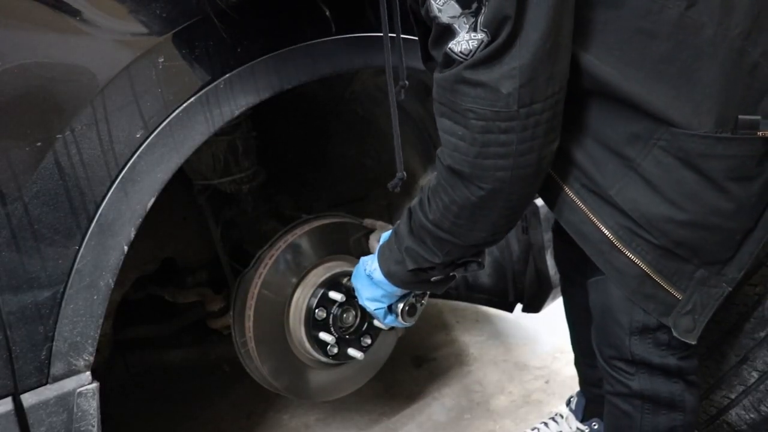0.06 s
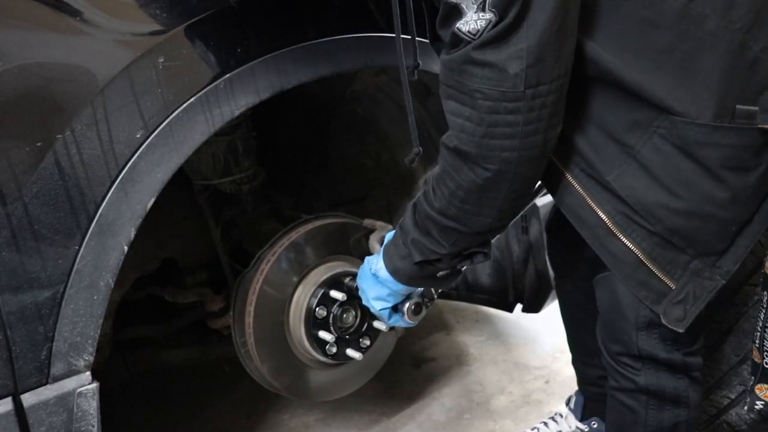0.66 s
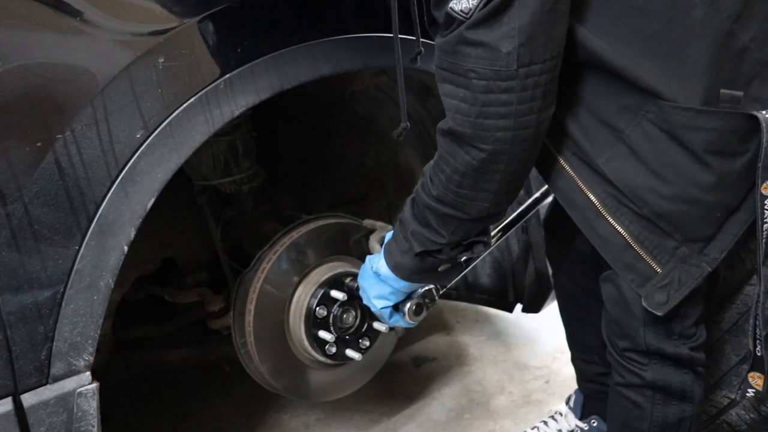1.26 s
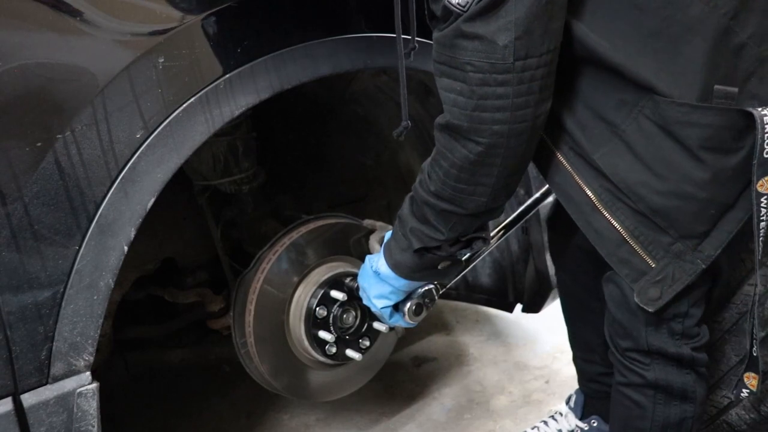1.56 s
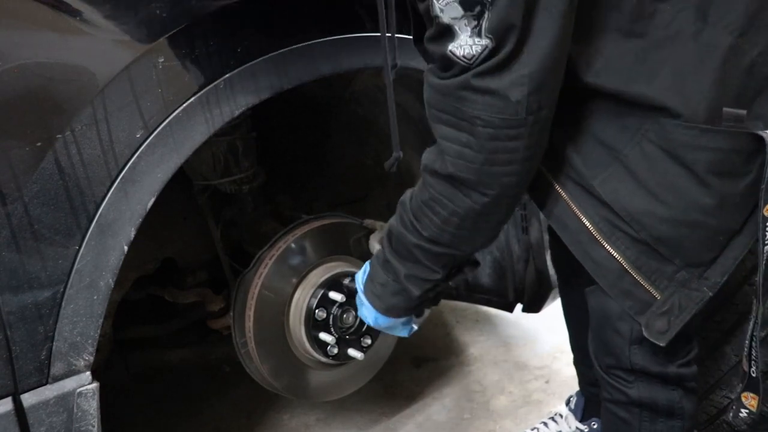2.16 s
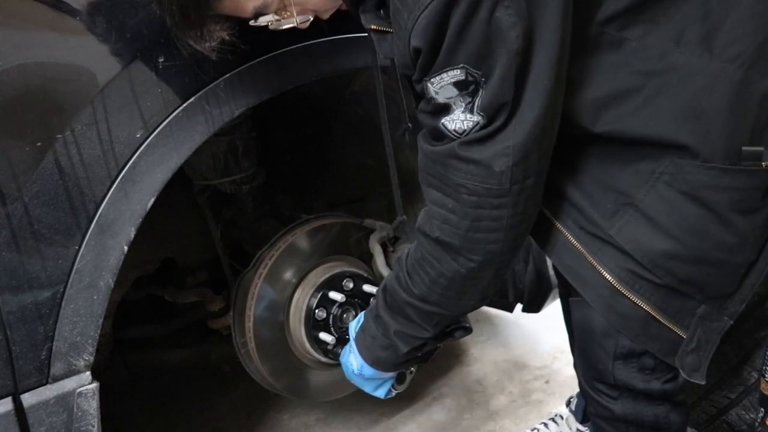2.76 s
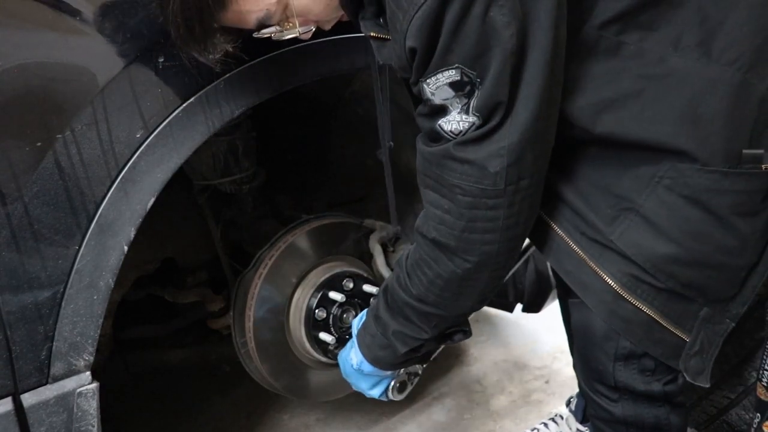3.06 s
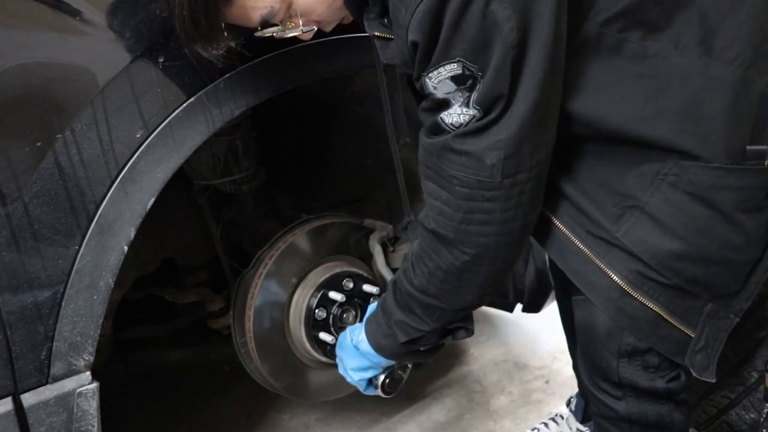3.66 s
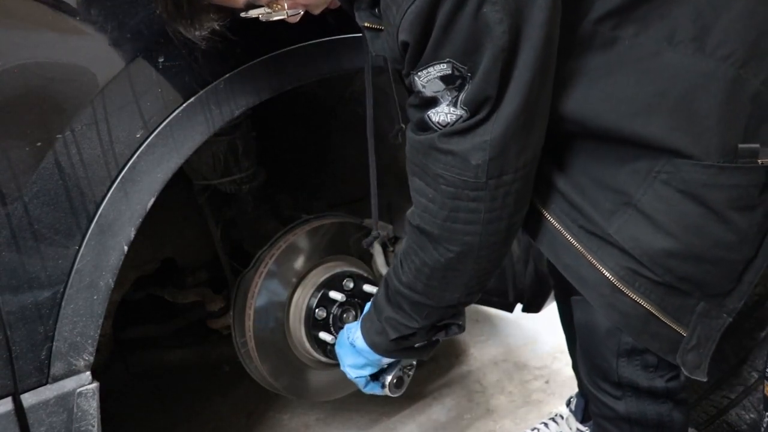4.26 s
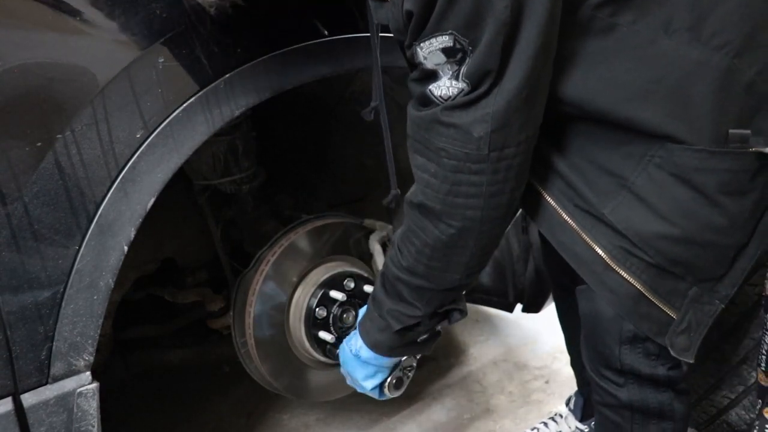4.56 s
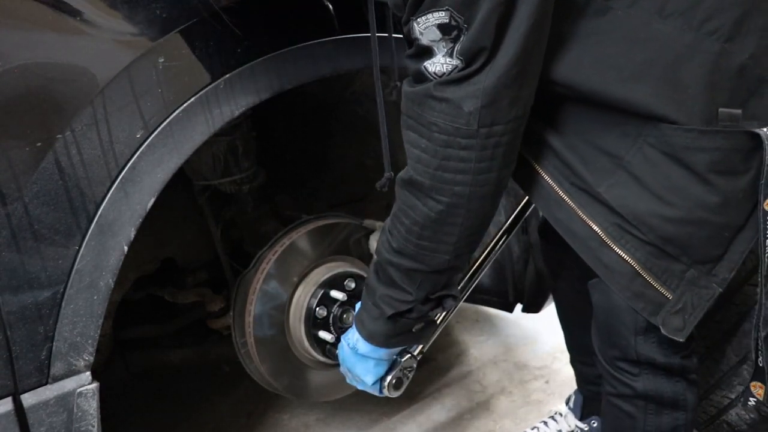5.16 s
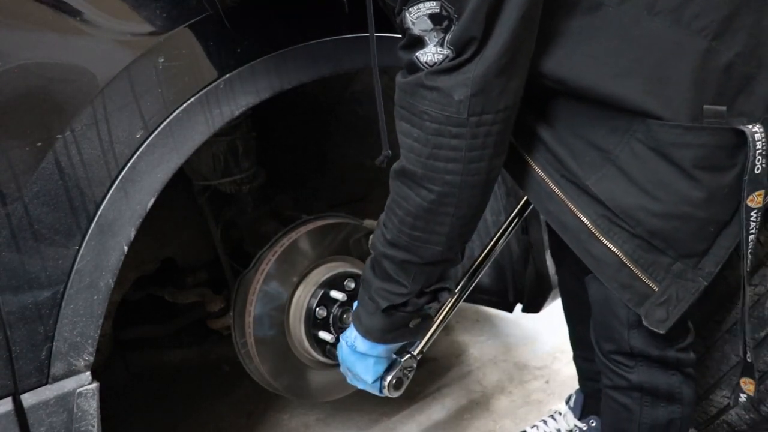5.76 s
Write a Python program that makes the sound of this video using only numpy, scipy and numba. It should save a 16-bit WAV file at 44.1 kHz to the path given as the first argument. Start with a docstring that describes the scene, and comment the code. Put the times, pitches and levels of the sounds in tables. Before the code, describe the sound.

A torque wrench works close by on a car's bare wheel hub in a quiet garage. Two ratchet ticks open, followed by faint socket taps around 0.4 seconds. After a slight rub, the wrench gives way at 1.5 seconds with a loud steel snap and a high ring, then snaps back at 1.9. From 2.2 to 3 seconds the socket knocks and clinks onto the next nut. Between 3.5 and 4 seconds the ratchet ticks about eight times while the nut scrapes softly on its thread. A few faint taps and a light rub follow, then a last hard, ringing snap at 5.6 seconds. The blows carry a low thud from the hub and a short room echo, and the snaps slightly overload the stereo microphones. A jacket rustles faintly now and then over low, steady room noise.

```python
"""A garage, close to a bare wheel hub, on a camera's stereo microphones. A long torque wrench
tightens two lug nuts: it breaks over with a ringing snap and snaps back, the socket knocks onto the
next nut, the ratchet ticks, and it snaps again. Each blow is steel chattering on steel: tool and brake
disc ring, the hub booms. A jacket rustles, the wheel well and the room answer, and the snaps overload
the camera's limiter."""
import sys
import numpy as np
from scipy import signal
from scipy.fft import rfft, irfft, next_fast_len
from scipy.io import wavfile
from scipy.ndimage import uniform_filter1d
from numba import njit

SR = 44100
rng = np.random.default_rng(int(sys.argv[2]) if len(sys.argv) > 2 else 0)


def pcm_store(signal):
    """Save signal as 16-bit PCM."""
    levels = np.round(np.clip(np.atleast_2d(signal), -1, 1) * 32767)
    wavfile.write(sys.argv[1], SR, levels.astype(np.int16).T)


N = 265041
T = np.arange(N) / SR
PORTS_HZ = 730  # longer waves reach both microphones alike

# The ringing of the wrench tube. Each row: frequency in Hz, level in dB, t60 in seconds.
TUBE_MODES = [(1979, -13, .7), (3284, -20, .4), (3890, -14, .12), (4022, -8, .35), (4116, 3, .46),
              (11025, -19, .34)]


def undb(db):
    """Decibels to gain."""
    return 10 ** (np.asarray(db) / 20)


def unit(x):
    """Scale to rms 1."""
    return x / np.sqrt(np.mean(x ** 2))


def fade(t, t60):
    """Exponential decay, 60 dB down after t60 seconds."""
    return np.exp(-np.log(1000) * t / max(t60, .002))


def on_log(hz, points_hz, values):
    """Read a curve on a log-frequency axis."""
    return np.interp(np.log(hz + 1), np.log(points_hz), values)


def colour(x, points):
    """Minimum-phase filter with the given (Hz, dB) response, falling away under its lowest point."""
    size = next_fast_len(x.shape[-1] + 4096, real=True) * 2
    hz = np.arange(size // 2 + 1) * SR / size
    points_hz, db = np.transpose(points)
    gain = undb(on_log(hz, points_hz, db)) * np.clip(hz / points_hz[0], .03, 1) ** 2
    cepstrum = irfft(np.log(gain))
    cepstrum[1:size // 2] *= 2
    cepstrum[size // 2 + 1:] = 0
    return irfft(rfft(x, size) * np.exp(rfft(cepstrum)))[..., :x.shape[-1]]


def stereo_noise(size, alike):
    """Noise at the two microphones: the same in the bass, with correlation `alike` in the treble."""
    hz = np.arange(size // 2 + 1) * SR / size
    treble = 1 - 1 / (1 + (hz / PORTS_HZ) ** 3)
    side_share = (1 - alike) * treble / 2
    mid, side = rfft(rng.standard_normal((2, size)))
    return irfft(np.sqrt(1 - side_share) * mid + np.sqrt(side_share) * np.array([side, -side]), size)


def wander(rate_hz):
    """A smooth random curve with rms 1."""
    hold = int(SR / rate_hz)
    steps = np.repeat(rng.standard_normal(N // hold + 1), hold)
    return unit(uniform_filter1d(uniform_filter1d(steps, hold), hold)[:N])


def add(track, start, sound):
    """Mix a sound in at `start` seconds."""
    i = int(start * SR)
    track[:, i:i + sound.shape[1]] += sound[:, :N - i]


def stroke(start, length, attack_s, t60):
    """One movement: it gathers speed, holds until its length is up and dies away."""
    return np.clip((T - start) / attack_s, 0, 1) * fade(np.clip(T - start - length, 0, 2 * t60), t60)


def room_tone():
    """Quiet workshop noise, wavering slightly, with a little hiss of each microphone's own."""
    # Each row: frequency in Hz, level in dB.
    spectrum = [(13, -37), (22, -21), (85, -0.5), (111, -12.5), (178, -4), (221, -16), (261, -6),
                (353, -12.5), (452, -9), (505, -19.5), (580, -15), (1290, -17), (1560, -15), (2700, -18),
                (15700, -32.5)]
    workshop = stereo_noise(N, 0) * undb(.6 * wander(13))
    hiss = 0.37 * rng.standard_normal((2, N))
    return undb(-54) * unit(colour(workshop + hiss, spectrum))


def garage_echoes(x, well_db, well_t60):
    """Quick reflections in the wheel well, then the room's tail, which lasts longest in the bass."""
    # The room's reverberation. Each row: frequency in Hz, level in dB, t60 and build-up in seconds.
    bands = [(60, -6.5, 0.83, 0.052), (133.2, -2.5, 1, 0.02), (260, -10.5, 0.55, 0.068),
             (600, -0.5, 0.65, .02), (1700, -6.5, 0.57, 0.0053), (3840, -10.5, 0.53, 0.025),
             (7400, -10, .45, 0.0215), (11000, -11, 0.14, .015), (15000, -13, .33, .01)]
    band_hz, db, t60, build_s = np.transpose(bands)
    t, hz = T[:SR], np.arange(SR // 2 + 1)
    well = fade(t, well_t60) * (t > .003)
    response = undb(well_db) * stereo_noise(SR, 0.1) * well / np.linalg.norm(well)
    diffuse = rfft(stereo_noise(SR, .05))
    for k, share in enumerate(np.eye(len(bands))):
        band = irfft(diffuse * on_log(hz, band_hz, share), SR)
        tail = fade(t, t60[k]) * (1 - np.exp(-t / build_s[k]))
        response += undb(db[k]) * band * tail / np.linalg.norm(tail)
    return signal.fftconvolve(x, response, axes=1)[:, :N]


def jacket():
    """Cloth rubs in uneven little slips while the worker's body shifts with a low rumble."""
    # Shifts of weight or arm. Each row: start and length in seconds, relative swish and rumble in dB.
    moves = [(0.0, .06, -58, -50), (0.365, 0.19, -59.5, -48), (2.403, 0.29, -69.5, -51.5),
             (3.169, 0.18, -61, -63), (4.037, 0.2, -59, -54), (4.205, 0.15, -64.5, -40.5),
             (4.589, 0.12, -62, -66), (4.997, 0.34, -75, -59), (5.492, 0.031, -50.5, -49)]
    # The spectra of cloth and body. Each row: frequency in Hz, level in dB.
    cloth_spectrum = [(210, -35), (350, -5.5), (672, -4.5), (826, -10.5), (1380, -4), (1490, -7),
                      (3350, -11.5), (4460, -15.5), (15700, -32.5)]
    body_spectrum = [(21, -42), (35, -2), (65, 2), (108, -3.5), (178, 1.5), (254, -3), (339, -16),
                     (500, -11), (650, -61), (1100, -120)]
    swish, rumble = np.zeros((2, N))
    for start, length, swish_db, rumble_db in moves:
        speed = stroke(start, length, attack_s=0.0177, t60=.55)
        swish += undb(swish_db) * speed
        rumble += undb(rumble_db) * speed
    cloth = unit(colour(stereo_noise(N, 0.24) * undb(2 * wander(160)), cloth_spectrum))
    body = unit(colour(stereo_noise(N, 0.26) * undb(2 * wander(30)), body_spectrum))
    return undb(7.5) * swish * cloth + undb(-3.5) * rumble * body


def grind(strokes, spectrum, attack_s, t60, rough_db):
    """Steel sliding on steel in quick uneven slips."""
    slips = unit(colour(stereo_noise(N, 0.3) * undb(rough_db * wander(220)), spectrum))
    return slips * sum(undb(db) * stroke(start, length, attack_s, t60) for start, length, db in strokes)


def seat_rub():
    """The nut's seat rubs faintly as the torque builds before a snap."""
    # Each row: start in seconds, length in seconds, level in dB.
    pulls = [(1.22, .12, -61.5), (4.86, 0.15, -59)]
    # Each row: frequency in Hz, level in dB.
    spectrum = [(800, -35.5), (1300, -15), (1520, -3), (1780, -4.5), (2100, -11.5), (5000, -33),
                (15000, -52)]
    return grind(pulls, spectrum, attack_s=0.0906, t60=1.3, rough_db=2.5)


def thread_scrape():
    """The nut scrapes round on its thread, lightly and then under load."""
    # Each row: start in seconds, length in seconds, level in dB.
    turns = [(3.53, 0.25, -52.5), (3.76, 0.23, -39.5)]
    # Each row: frequency in Hz, level in dB.
    spectrum = [(70, -3), (170, -3), (330, 0), (600, -3.5), (900, -7), (1700, 0.5), (3500, -11),
                (12000, -22)]
    return grind(turns, spectrum, attack_s=0.0053, t60=0.25, rough_db=-1)


def release_creak():
    """The torque release grinds just before it first gives way."""
    # Each row: start in seconds, length in seconds, level in dB.
    creaks = [(1.44, 0.017, -16.5)]
    # Each row: frequency in Hz, level in dB.
    spectrum = [(59, -37.5), (100, -9.5), (730, -4.5), (1190, -12), (2240, 0), (2950, -7), (4500, 0),
                (5220, -11), (9440, -11.5), (15700, -17.5)]
    return grind(creaks, spectrum, attack_s=0.0041, t60=.06, rough_db=-0.5)


def ring(modes, spread_rad):
    """Modes struck a little unevenly; the higher ones reach the two microphones out of phase."""
    length_s = min(2, max(t60 for _, _, t60 in modes))
    t, tone = T[:int(SR * length_s)], 0
    for hz, db, t60 in modes:
        strength, phase, side = rng.standard_normal(3)
        right_shift = np.sign(side) * spread_rad * hz ** 2 / (hz ** 2 + PORTS_HZ ** 2)
        phases = np.array([[0], [right_shift]]) + np.pi * phase
        tone = tone + undb(db + strength / 2) * fade(t, t60) * np.sin(2 * np.pi * hz * t + phases)
    return tone


def blows(events, spectrum, modes, crack_db, ring_db, disc_db, hub_db, hub_t60,
          resonance_db, alike, rise_s, hold_s, grit_db):
    """Steel on steel, as two stereo tracks: chatter with the hub's boom, and ringing tool and disc."""
    # Brake disc and spring ringing on. Each row: frequency in Hz, level in dB, t60 in seconds.
    disc_modes = [(106, -13, 1.8), (252, -15.5, 2.7), (460, -19.5, 1.4), (716, -30, 7.8), (870, -37, 2),
                  (1255, -6, 0.62), (1456, -5.5, 0.64), (1680, -1, 0.55), (1990, 5.5, 0.2), (1979, -11, .7),
                  (2098, -10, 0.27), (2560, -10, 0.6), (4800, -10.5, 0.52)]
    # Hub, suspension and panels, shaken through the studs. Each row: frequency in Hz, level in dB.
    hub_spectrum = [(55, -13), (85, -14), (112, -0.5), (175, -7), (220, 2.5), (255, 2.5), (330, -11),
                    (500, -33), (2000, -70)]
    contact, tones = np.zeros((2, 2, N))
    t = T[:SR // 3]
    disc = ring(disc_modes, spread_rad=0.92)
    hz = np.geomspace(spectrum[0][0], 16000, 160)
    for start, db, body_db, treble_db, resonance_hz, extra_ring_db, thud_db, chatter_t60 in events:
        # a harder contact is brighter, a broader one has more body; each favours one damped resonance
        bass_db = thud_db + body_db / 2
        tilt_db = [bass_db, body_db, body_db, 0, 0, treble_db]
        shape_db = on_log(hz, *np.transpose(spectrum))
        shape_db += on_log(hz, [400, 1100, 2200, 3700, 5500, 11000], tilt_db)
        shape_db += resonance_db / (1 + ((hz - resonance_hz) / 300) ** 2)
        # the chatter is a string of tiny uneven bounces, about a millisecond apart
        bounces = undb(grit_db * np.repeat(rng.standard_normal(len(t)), SR // 1000)[:len(t)])
        envelope = fade(np.maximum(t - hold_s, 0), chatter_t60) * (1 - fade(t, rise_s))
        crack = colour(stereo_noise(len(t), alike) * bounces * envelope, np.transpose([hz, shape_db]))
        add(contact, start, undb(db + crack_db) * crack / np.std(crack[:, :SR // 150]))
        # the heavy parts have many close modes, so their boom is rough
        boom = colour(stereo_noise(len(t), .1) * fade(t, hub_t60), hub_spectrum)
        add(contact, start, undb(db + hub_db + bass_db) * boom / np.std(boom[:, :SR // 16]))
        # every blow lands a little differently and sets the tool ringing anew
        add(tones, start, undb(db + ring_db + extra_ring_db) * ring(modes, spread_rad=1.7))
        add(tones, start, undb(db + disc_db + body_db) * disc)
    return np.array([contact, tones])


def ratchet_ticks(chatter_t60=0.057):
    """The pawl slips over the teeth and bounces as the handle swings back."""
    # Each row: start in seconds, relative level, extra body and extra treble in dB, resonance in Hz.
    ticks = [(0.077, -7, -2.5, -3, 12100), (0.154, -8.5, -1, 0.5, 8100), (0.328, -26.5, -10.5, -1.5, 4000),
             (3.512, -9.5, 1, 2, 3800), (3.613, -10.5, -2, -0.5, 4070), (3.684, -10.5, -2, -1, 3950),
             (3.743, -6, -7, -4.5, 14000), (3.772, -7, 4, -11, 3800), (3.784, -8.5, 4, -3, 3870),
             (3.862, -9, 0, -0.5, 3540), (3.942, -9, -0.5, -2.5, 12000), (4.179, -34.5, 3, -5, 2290),
             (4.741, -33.5, 1, -7.5, 1640), (5.378, -36.5, 0, -0.5, 2780)]
    # The pawl's contact. Each row: frequency in Hz, level in dB.
    spectrum = [(150, -26.5), (300, -14), (600, -20), (1000, -14.5), (1700, -5.5), (3000, -4.5),
                (3800, -0.5), (4900, -5), (8000, -4), (9600, -2), (10500, -10), (12200, -2.5),
                (14500, -1.5), (15700, -10.5)]
    teeth = [(*tick, 0, 0, chatter_t60) for tick in ticks]  # no extra ring or thud
    return blows(teeth, spectrum, TUBE_MODES, crack_db=-11.5, ring_db=-44, disc_db=-56, hub_db=-39,
                 hub_t60=0.52, resonance_db=7.5, alike=0.25, rise_s=0.0069, hold_s=0.0009, grit_db=3.5)


def socket_knocks():
    """The socket knocks against nuts and studs and rings."""
    # Each row: start in seconds, relative level, extra body and extra treble in dB, resonance in Hz,
    # extra ring and extra thud in dB, chatter t60 in seconds.
    knocks = [(0.368, -34, -3.5, -8, 1030, -9, -6, 0.19), (0.394, -33, 15, -5, 1150, -20, 0, 0.19),
              (0.519, -29.5, 1.5, 7.5, 2300, -13, 2, 0.043), (2.244, -19.5, 5.5, 5, 3960, -11, -1, 0.095),
              (2.28, -13.5, -5, 6, 3360, -12, -4.5, 0.076), (2.406, -27.5, -14, -17, 4130, -17, 2.5, 0.036),
              (2.771, -12.5, 2, 0, 3490, 3, 1.5, 0.1), (2.829, -7.5, -5, 1.5, 2170, -6, -4.5, 0.069),
              (2.86, -10, -9.5, -5, 4070, 6, 3.5, 0.079), (3.013, -15, -6, -8.5, 3520, -3, -2.5, 0.095),
              (4.26, -30.5, 12, -5, 1470, -13.5, 0, 0.046), (4.294, -39.5, 4, -3.5, 1900, -5, -12, 0.042),
              (4.758, -37.5, -16, -6, 4340, -12, -10, 0.068), (4.872, -39.5, -4, -8, 1350, -5, 1, 0.091),
              (5.558, -31, -3, -11, 1340, -9, -4, 0.048)]
    # The socket's contact. Each row: frequency in Hz, level in dB.
    spectrum = [(150, -11.5), (260, -3), (420, -12.5), (780, -20.5), (1250, -9), (2500, -6), (3400, -13.5),
                (5000, -12), (6200, -22), (8200, -18), (11000, -29.5), (14200, -28), (15500, -17)]
    # The socket ringing on its nut. Each row: frequency in Hz, level in dB, t60 in seconds.
    modes = [(1728, -9, 0.45), (1981, -6, 0.29), (2550, -4, 0.18), (2510, -1, 0.25), (3138, -2, 0.27),
             (3320, -4, 0.23), (4027, -6, .2), (4118, -10, 0.42), (4371, -2, 0.28), (5180, -4, 0.15),
             (8140, -27, 0.18), (15340, -26, 0.186)]
    return blows(knocks, spectrum, modes, crack_db=-10.5, ring_db=-21.5, disc_db=-39, hub_db=-27.5,
                 hub_t60=0.35, resonance_db=13, alike=0.31, rise_s=0.0034, hold_s=.0005, grit_db=2.5)


def torque_snaps():
    """The release breaks over or snaps back with a hard crack that sets the wrench tube ringing."""
    # Each row: start in seconds, relative level, extra body and extra treble in dB, resonance in Hz,
    # extra ring and extra thud in dB, chatter t60 in seconds.
    snaps = [(1.4652, -1.5, -3, 2.5, 2510, 2, -1.5, 0.03), (1.8963, -4, 1, -5, 1750, 1, 0.5, 0.029),
             (5.616, -3, 0, 0.5, 3920, 5, -3, 0.069)]
    # The release's contact. Each row: frequency in Hz, level in dB.
    spectrum = [(60, -22), (120, -14), (240, -12), (380, -24), (750, -24.5), (1050, -24), (1500, -13),
                (1950, -5), (3200, -11.5), (4100, -3), (5600, -12.5), (7200, -13.5), (10500, -21),
                (14800, -19)]
    return blows(snaps, spectrum, TUBE_MODES, crack_db=3.5, ring_db=-13.5, disc_db=-23, hub_db=-22.5,
                 hub_t60=0.29, resonance_db=5.5, alike=0.48, rise_s=.0008, hold_s=0.0074, grit_db=2)


def scene():
    """The tool close by, its echoes, the nut on its thread and seat, the jacket and the quiet room."""
    contact, tones = torque_snaps() + socket_knocks() + ratchet_ticks()
    contact += release_creak()
    echoes = garage_echoes(contact + undb(-16) * tones, well_db=-6, well_t60=0.16)
    return contact + tones + echoes + thread_scrape() + seat_rub() + jacket() + room_tone()


@njit
def follow(x, attack, release):
    """Envelope that rises fast and sinks slowly."""
    envelope, level = np.empty(len(x)), 0.
    for i in range(len(x)):
        level += (x[i] - level) * (attack if x[i] > level else release)
        envelope[i] = level
    return envelope


def limit(x, top_db, attack_s, release_s):
    """A limiter that ducks just after each snap and lets the tail swell back."""
    envelope = follow(np.abs(x).max(axis=0), 1 / (attack_s * SR), 1 / (release_s * SR))
    return x / np.maximum(1, envelope / undb(top_db))


def overload(x, lopsided):
    """One half of the wave gives way before the other, so the loudest cracks carry a short low thump."""
    bent = np.clip(x - lopsided * np.clip(x, -1, 1) ** 2, -1, 1)
    return signal.lfilter(*signal.butter(1, 30, "high", fs=SR), bent)


def record(dry):
    """The camera, its left microphone duller, limits, clips what gets through and cuts the top."""
    # The left microphone relative to the right. Each row: frequency in Hz, gain in dB.
    left_response = [(10, 2.5), (130, 0.5), (380, -2), (1000, 2), (2400, -1.2), (4400, -1.06), (8500, 1.5),
                     (11500, -1.5), (14500, -7.5)]
    microphones = np.array([colour(dry[0], left_response), dry[1]])
    limited = limit(microphones, top_db=-11.5, attack_s=0.011, release_s=0.078)
    top_cut = signal.ellip(12, .2, 70, 15800, fs=SR, output="sos")
    return signal.sosfilt(top_cut, overload(limited, lopsided=0.07))


dry = scene()
out = record(dry)
pcm_store(out)
```